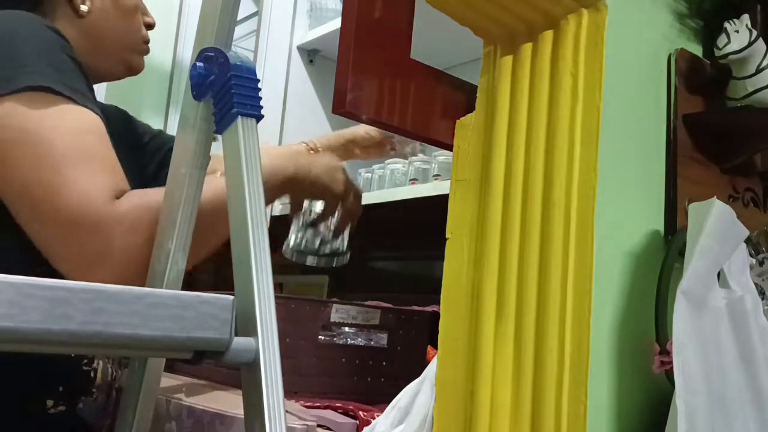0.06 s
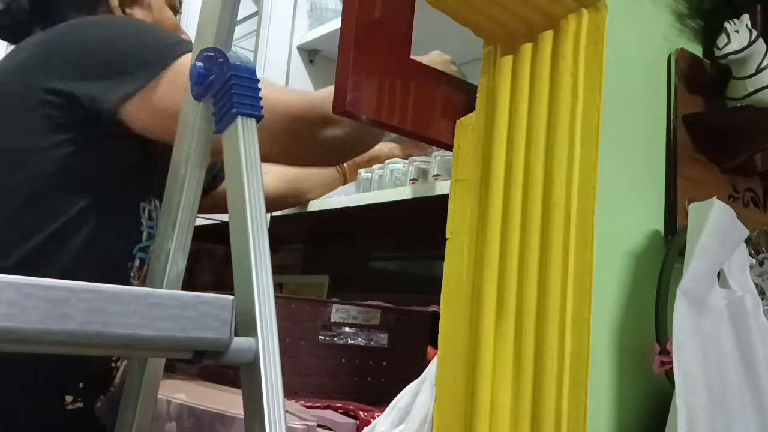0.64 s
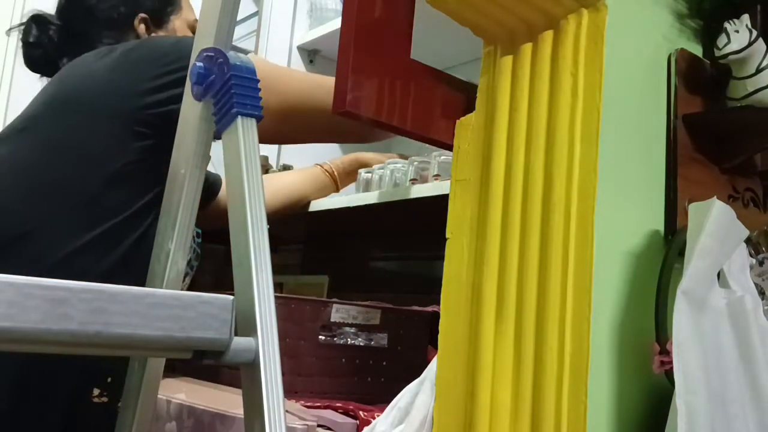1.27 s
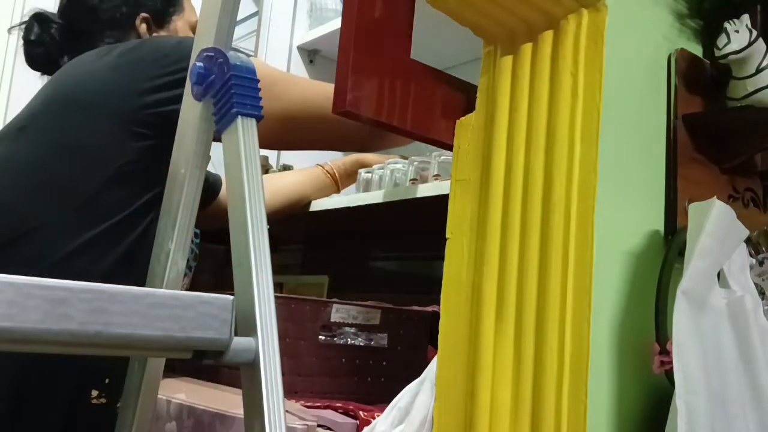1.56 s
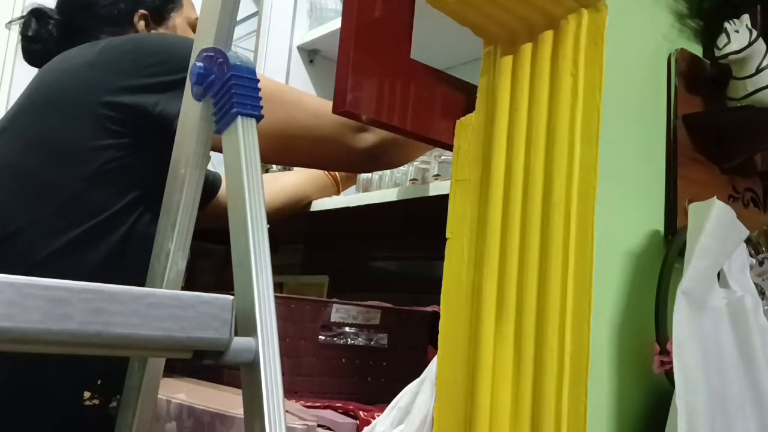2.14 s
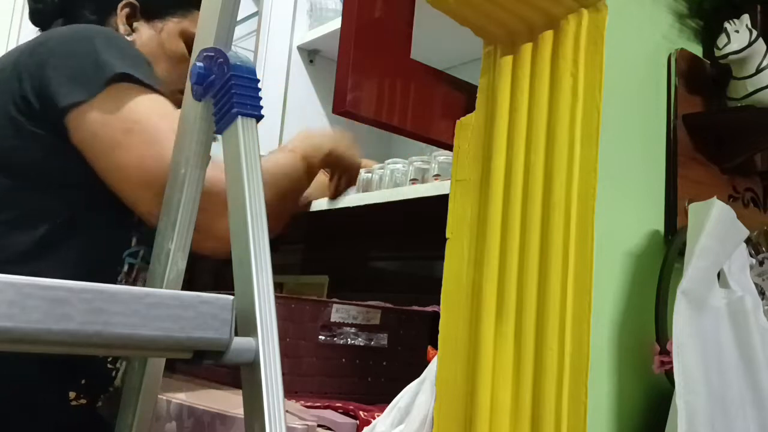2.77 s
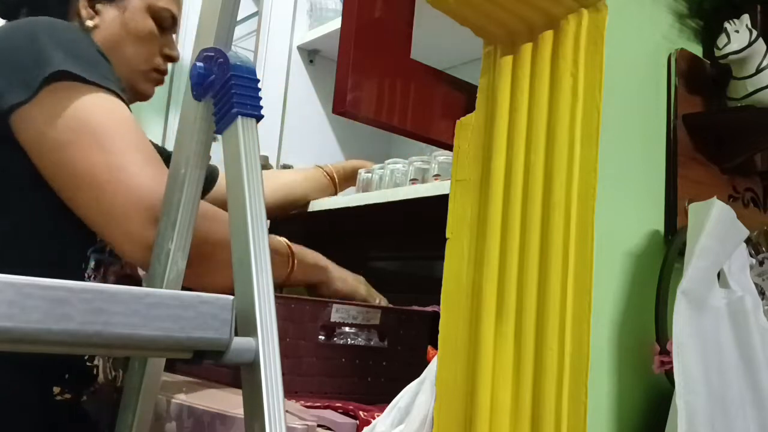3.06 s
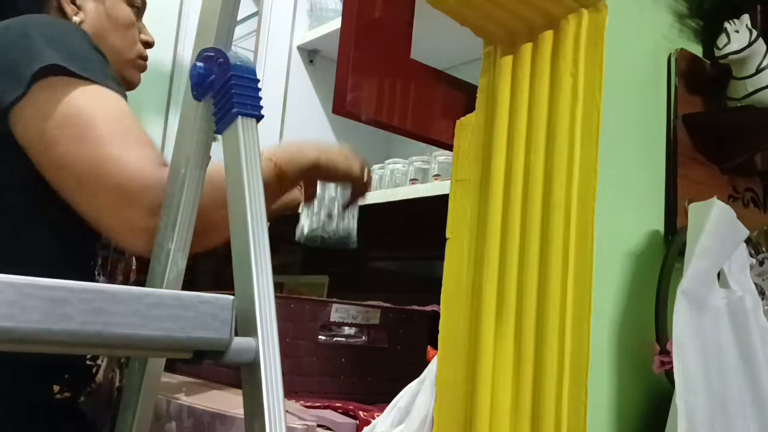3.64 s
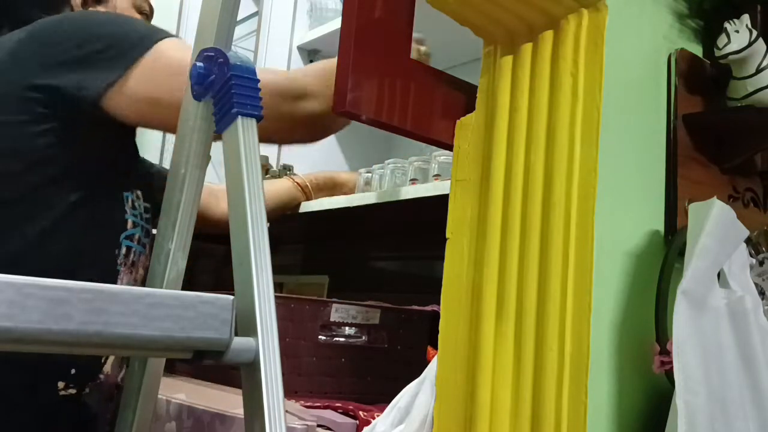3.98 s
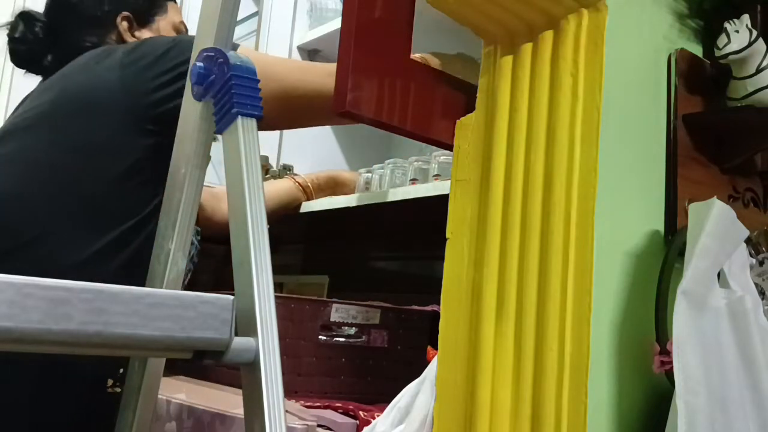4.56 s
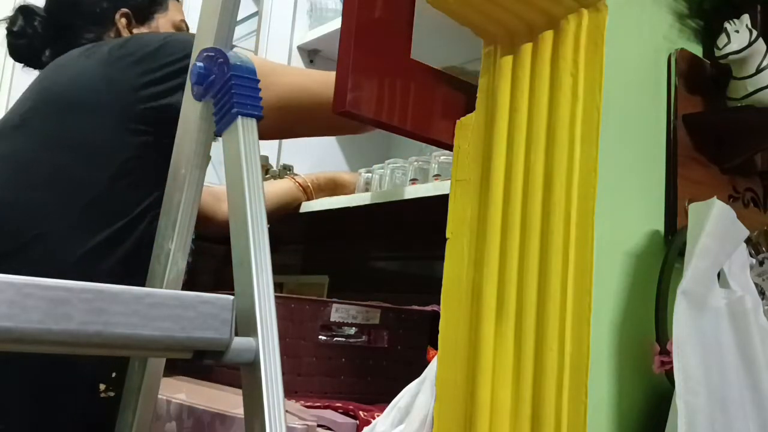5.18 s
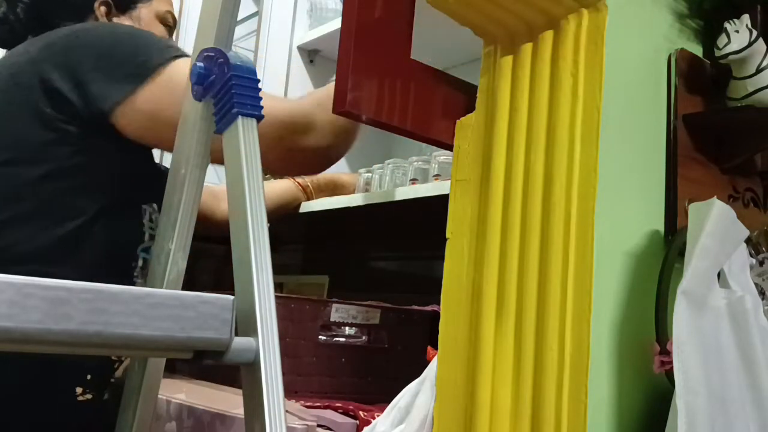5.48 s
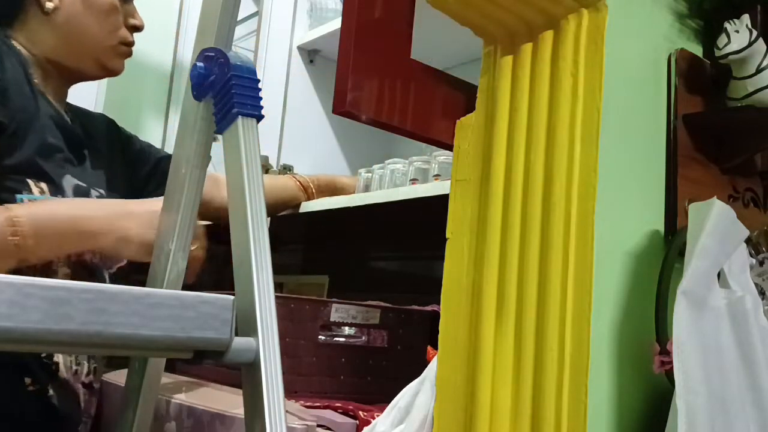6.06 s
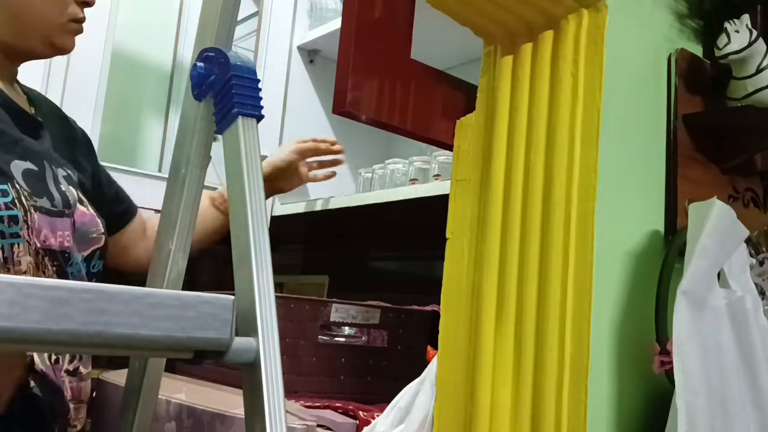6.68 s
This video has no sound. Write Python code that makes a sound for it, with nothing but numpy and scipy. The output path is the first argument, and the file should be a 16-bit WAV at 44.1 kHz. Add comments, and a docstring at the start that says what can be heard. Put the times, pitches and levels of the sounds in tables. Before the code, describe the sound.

Drinking glasses knock onto a cabinet shelf and clink together with brief rings, while bangles clack in an echoing kitchen.

```python
"""Drinking glasses are lifted from a crate and set down on a cabinet shelf in a hard-walled kitchen.
Each base knocks the board and rings briefly, and glasses held together chime.
Bangles clack and slide on the wrist. The room echoes every contact, and a noise suppressor
turns the pauses down, so the room noise swells around each sound."""
import sys
import numpy as np
from scipy import signal
from scipy.fft import rfft, irfft, next_fast_len
from scipy.io import wavfile
from scipy.ndimage import uniform_filter1d, map_coordinates

SR = 44100
rng = np.random.default_rng(int(sys.argv[2]) if len(sys.argv) > 2 else 0)


def store_wav(level_fs):
    """Save 16-bit WAV to argv[1]."""
    pcm = np.round(np.clip(np.atleast_2d(level_fs), -1, 1) * 32767)
    wavfile.write(sys.argv[1], SR, pcm.T.astype(np.int16))


N = 300762
T = np.arange(SR) / SR  # the first second after a contact


def amp(db):
    """Turn decibels into a gain."""
    return np.exp(np.asarray(db) * np.log(10) / 20)


def along(points, hz):
    """Read the value at any pitch from (pitch_hz, value) points."""
    pitches, values = np.transpose(points)
    return np.interp(np.log(hz + 1), np.log(pitches + 1), values)


def peaks(resonances, hz):
    """Decibels that (pitch_hz, width_hz, boost_db) resonances add at each pitch."""
    return sum(db / (1 + (2 * (hz - centre) / width) ** 2) for centre, width, db in resonances)


def treble(hz, edge_hz):
    """Rise smoothly from 0 below the edge to 1 above it."""
    return hz ** 4 / (hz ** 4 + edge_hz ** 4)


def filtered(sound, gain):
    """Give each pitch in a sound its own gain."""
    size = next_fast_len(sound.shape[-1] + SR // 10)
    return irfft(rfft(sound, size) * gain(np.fft.rfftfreq(size, 1 / SR)), size)[..., :sound.shape[-1]]


def unit_hit(hit):
    """Scale a hit to average (rms) level 1 over its first sixteenth of a second."""
    return hit / np.sqrt(np.mean(hit[..., :SR // 16] ** 2, axis=-1, keepdims=True) + 1e-20)


def coloured(hit, gain_db):
    """Shape a hit's tone so that its resonances ring only after the blow."""
    cepstrum = irfft(np.log(amp(gain_db(np.fft.rfftfreq(SR, 1 / SR)))))
    cepstrum[1:SR // 2] *= 2
    cepstrum[SR // 2 + 1:] = 0
    return unit_hit(irfft(rfft(hit, SR) * np.exp(rfft(cepstrum))))


def steady_noise(tone):
    """Noise with the given tone, at average (rms) level 1."""
    noise = filtered(rng.standard_normal(N), lambda f: amp(along(tone, f)))
    return noise / noise.std()


def wobble(per_s):
    """A smooth curve through per_s random values a second."""
    return map_coordinates(rng.standard_normal(int(N * per_s / SR) + 4), [np.arange(N) * per_s / SR])


def add(track, start_s, sound):
    """Mix a sound into a track."""
    start = round(start_s * SR)
    part = sound[max(-start, 0):N - start]
    track[max(start, 0):][:len(part)] += part


# How long the kitchen echoes: pitch_hz, fade_s (a fade is the time to drop 60 dB)
ROOM_FADE = [(120, 0.85), (400, 0.63), (1000, 0.48), (2500, 0.48), (5000, 0.47), (9500, .4), (15000, .32)]
# First echoes off the walls: delay_s, level_db
WALL_ECHOES = [(.0045, 0.5), (0.0105, -10), (.022, 2), (0.038, 2)]
def kitchen(direct_db, walls_db, build_s, contact_s, bend=1.196, smear_s=.035):
    """A contact in the room: a short burst, wall echoes smeared by furniture, then a long tail."""
    hz, t, bands = signal.stft(rng.standard_normal(SR), SR, nperseg=256)
    fade = amp(-60 * (t / along(ROOM_FADE, hz)[:, None]) ** bend)  # slow at first, then faster
    tail = signal.istft(bands * fade, SR, nperseg=256)[1][:SR]
    tail *= 1 - np.exp(-T / build_s)
    direct = rng.standard_normal(SR) * amp(-60 * T / contact_s) * (1 - np.exp(-T / 0.0018))
    bounces = sum(amp(db - 60 * np.abs(T - s) / smear_s) * (T > s) for s, db in WALL_ECHOES)
    walls = rng.standard_normal(SR) * bounces
    parts = [(0, tail), (direct_db, direct), (walls_db, walls)]
    return sum(amp(db) * part / np.linalg.norm(part) for db, part in parts)


# Glass touches glass, waking the rim, wall and high notes: start_s, tick_db, rim_db, wall_db, high_db
TOUCHES = [(-.02, -34.5, -20, -36, -41), (3.36, -58, -62.5, -80, -93.5), (3.427, -41.5, -24, -47, -66),
           (3.451, -39, -36, -49, -68), (3.472, -43.5, -22.5, -44.5, -67.5),
           (3.498, -43.5, -20.5, -36.5, -40), (3.51, -40, -24, -31, -43), (3.523, -43, -27.5, -32.5, -44),
           (3.538, -49.5, -23.5, -29, -36.5), (3.559, -48, -20.5, -25.5, -40)]
# Tone of the tick as they touch: pitch_hz, level_db
TICK_TONE = [(200, -25), (550, -15), (850, -6.5), (1700, -3.5), (3000, -3), (4500, -28), (7000, -38.5),
             (9500, -29), (16000, -56)]
def glass_ticks():
    """Glasses in one hand tick as they meet, more brightly when the high notes are strong."""
    out = np.zeros(N)
    for start_s, tick_db, rim_db, _, high_db in TOUCHES:
        bright_db = 0.44 * (high_db - rim_db) + 13.5
        hit = kitchen(direct_db=-1, walls_db=-7, build_s=0.0069, contact_s=0.0091)
        tick = coloured(hit, lambda f: along(TICK_TONE, f) + bright_db * treble(f, edge_hz=5000))
        add(out, start_s, amp(tick_db) * tick)
    return out


# The high notes of a drinking glass: pitch_hz, level_db
HIGH_NOTES = [(5830, -7), (5900, -17), (8640, -9.5), (8770, -2), (8900, -6.5), (10990, -17.5), (12080, -14),
              (12560, -30.5), (13680, -30.5), (14680, -33), (15080, -27)]
def glass_chimes(rim_hz=2436, wall_hz=3088, rim_fade_s=0.67, jolt_rad=0.65, rub_rad=0.23, flutter_db=2.5):
    """Held glasses ring freely: each touch feeds their notes and jolts the vibration."""
    ring, t = np.zeros(N), np.arange(N) / SR
    starts, _, rim_db, wall_db, high_db = np.transpose(TOUCHES)
    high = [(hz, high_db + db - 2 * np.log2(hz / 8800)) for hz, db in HIGH_NOTES]
    for hz, levels in [(rim_hz, rim_db), (wall_hz, wall_db)] + high:
        energy, jolts = np.zeros(N), np.zeros(N)
        fade_s = rim_fade_s * (rim_hz / hz) ** 0.43
        fade = amp(-60 * T / fade_s)
        for start_s, db in zip(starts, levels):
            add(energy, start_s, (amp(db) * fade) ** 2)
            add(jolts, start_s, rng.normal(0, jolt_rad, 1))
        swing = np.abs(uniform_filter1d(np.sqrt(2 * energy), size=48))
        flutter = (hz / rim_hz) ** .5 * wobble(per_s=110)  # rubbing shakes the high notes most
        phase = uniform_filter1d(np.cumsum(jolts), size=48) + rub_rad * flutter
        ring += swing * amp(flutter_db * flutter) * np.sin(2 * np.pi * hz * t + phase)
    room = kitchen(direct_db=-16, walls_db=-8, build_s=0.0037, contact_s=0.012)
    echo = signal.fftconvolve(ring, room)[:N]
    return (ring + amp(-11) * echo) * waver_and_drop(t)


def waver_and_drop(t, lift_s=3.588, waver_hz=6.1, waver_db=10.5, drop_s=3.83, drop_db_per_s=166):
    """The level wavers once the glasses are lifted; then the ring and its echo fall away quickly,
    as the noise suppressor turns them down."""
    waver = np.sin(np.pi * waver_hz * np.maximum(t - lift_s, 0)) ** 4
    drop_db = np.clip(drop_db_per_s * (t - drop_s), 0, 14.5)
    return amp(-waver_db * waver - drop_db)


# Tone of the quiet kitchen: pitch_hz, level_db
ROOM_TONE = [(25, -42), (58, -9), (100, -5), (190, -7.5), (310, -11), (550, -14), (1000, -16.5),
             (1650, -22.5), (2600, -29), (4200, -40), (7000, -50), (9400, -42), (12000, -51), (16000, -62)]
def room_noise():
    """A faint, low, steady rush fills the room."""
    return amp(-52) * steady_noise(ROOM_TONE)


# Bangles hit each other: start_s, level_db, treble_db
BANGLE_HITS = [(.044, -29, 6.5), (.067, -33, -2.5), (.493, -22, 3), (2.231, -46, -6), (3.047, -46.5, -2),
               (4.083, -39.5, 0), (4.607, -50.5, -12.5), (4.925, -35, 0.5), (5.977, -42.5, 0),
               (6.186, -30.5, 3), (6.316, -32, 3), (6.455, -38, -2.5)]
# Overall tone of a clack: pitch_hz, level_db
CLACK_TONE = [(100, -19), (330, -14.5), (700, -19), (1100, -16.5), (1300, -5.5), (2300, -0.5),
              (3000, -14.5), (4200, -16), (4700, -23), (8300, -16), (9700, -10), (12500, -20.5),
              (15500, -21)]
# Pitches that stand out in a clack: pitch_hz, width_hz, boost_db
CLACK_PEAKS = [(1250, 50, 10.5), (1350, 100, 4), (1504.5, 140, 7.5), (1812, 26, 4), (1890, 35, 3),
               (2205, 22, 9), (2810, 80, 6), (3370, 43, 8), (3950, 170, 6.5), (6450, 880, 3.5),
               (9270, 1100, 7.5)]
def bangle_clacks():
    """Bangles meet in hard, short clacks that set the whole room echoing."""
    out = np.zeros(N)
    for start_s, level_db, treble_db in BANGLE_HITS:
        hit = kitchen(direct_db=-8, walls_db=-15, build_s=0.0019, contact_s=0.017, bend=1.1)
        tone_db = lambda f: along(CLACK_TONE, f) + peaks(CLACK_PEAKS, f) + treble_db * treble(f, 4600)
        add(out, start_s, amp(level_db) * coloured(hit, tone_db))
    return out


# A glass lands on the shelf: start_s, knock_db, knock_hz, bass_db, rim_db, high_db, rim_hz
LANDINGS = [(.338, -19, 626, -7, -18.5, -38, 2424), (.347, -14.5, 700, -3.5, -31, -44.5, 2445),
            (.368, -31, 627, -6, -22.5, -44.5, 2460), (.453, -36.5, 520, -9.5, -38.5, -56, 2655),
            (.614, -26, 720, 0, -37, -56.5, 2478), (.655, -31, 756, 5, -43.5, -64, 2440),
            (.772, -28, 799, 2.5, -43.5, -57, 2520), (1.072, -18.5, 662, -11, -33.5, -40.5, 2470),
            (1.21, -24.5, 590, -3.5, -34.5, -61, 2470), (1.282, -27, 561, 3, -26, -48.5, 2463),
            (1.449, -22, 852, 2, -30, -48, 2483), (2.018, -58.5, 815, 3.5, -85, -78, 2425),
            (2.232, -29.5, 586, 7.5, -50, -64, 2370), (2.253, -29, 482, 9, -46, -62.5, 2396),
            (2.272, -33, 479, 5, -49, -64, 2420), (2.386, -45.5, 474, 9, -68, -78.5, 2440),
            (4.628, -41, 736, 20, -67, -71, 2470), (4.661, -27, 500, 8, -28.5, -52, 2379),
            (4.711, -23.5, 727.4, -2.5, -31.5, -43.5, 2453), (4.947, -28.5, 856, 5, -42.5, -73, 2503)]
# Tone of the thud: pitch_hz, level_db
THUD_TONE = [(40, -44), (100, -16.5), (200, -6), (380, -2), (650, 2), (1100, 1.5), (1800, -9),
             (2900, -10.5), (3700, -35), (5000, -42), (7500, -42.5), (9500, -32), (12000, -49.5),
             (16000, -51.5)]
def glasses_set_down():
    """A thick base knocks the board, and both the shelf and the glass ring."""
    out = np.zeros(N)
    for start_s, knock_db, knock_hz, bass_db, rim_db, high_db, rim_hz in LANDINGS:
        # each spot on the board favours its own pitches
        spot_db = lambda f: peaks([(knock_hz, 220, 6)], f) + bass_db / (1 + (f / 260) ** 4)
        hit = kitchen(direct_db=-5.5, walls_db=-9, build_s=0.0044, contact_s=0.027)
        thud = coloured(hit, lambda f: along(THUD_TONE, f) + spot_db(f))
        knock = amp(-2.5) * thud + amp(-5.5) * shelf_ring(spot_db)
        add(out, start_s, amp(knock_db) * knock + damped_glass(knock_db, rim_db, high_db, rim_hz))
    return out


# Notes of the loaded shelf and cabinet: pitch_hz, level_db, fade_s
SHELF_NOTES = [(152.8, -9.5, 0.38), (244.3, -8.5, 0.92), (312.7, -6.5, 0.42), (337, -10, .4),
               (469.4, 0, .5), (555, -1, 0.38), (649.7, -2.5, 0.45), (735, -2.5, 0.13), (756, 1.5, 0.38),
               (727, -7, 0.12), (869, -2.5, 0.61), (814, -3.5, 0.11), (1044, -11, 0.93), (1130, -5.5, 0.6),
               (1306, -6.5, 0.15), (1340, -10.5, 0.57), (1417, -7, 0.71)]
def shelf_ring(spot_db, spread_db=5, rise_s=0.0021):
    """The shelf's notes ring at new strengths for each landing."""
    hz, db, fade_s = np.transpose(SHELF_NOTES)
    db = db + rng.normal(0, spread_db, len(hz)) + spot_db(hz)
    phase = 2 * np.pi * (np.outer(hz, T) + rng.random((len(hz), 1)))
    notes = np.sin(phase) * amp(-60 * T / fade_s[:, None])
    return unit_hit(amp(db) @ notes * (1 - np.exp(-T / rise_s)))


def damped_glass(knock_db, rim_db, high_db, rim_hz, wall_hz=3102, light_fade_s=0.09, halving_db=12.5):
    """The glass bends and rings until the board stops it: sooner for firm knocks and high notes."""
    room = kitchen(direct_db=-1, walls_db=-1.5, build_s=0.011, contact_s=0.056)
    high_hz, note_db = np.transpose(HIGH_NOTES)
    grip_shift = 1 + 0.0068 * rng.standard_normal(len(high_hz))  # each grip retunes the high notes
    hz = np.r_[rim_hz, wall_hz, high_hz * grip_shift]
    wall_db = rim_db + 0.43 * (knock_db - rim_db) - 8.5
    db = np.r_[rim_db, wall_db, high_db + note_db + rng.normal(0, 1.5, len(high_hz))]
    fade_s = light_fade_s * .5 ** ((knock_db - rim_db) / halving_db) * (rim_hz / hz) ** 0.5
    t = T[:SR // 3]
    notes = np.sin(2 * np.pi * np.outer(hz, t)) * amp(-60 * t / fade_s[:, None])
    notes *= 1 - np.exp(-t / 0.00097)
    heard = signal.fftconvolve(notes, room[None, :SR * 2 // 3], axes=1)
    return np.pad(amp(db) @ unit_hit(heard), (0, SR - heard.shape[1]))


# Bangles slide along the moving forearm: start_s, length_s, level_db
BANGLE_SLIDES = [(2.08, .2, -78), (3.12, .4, -72.5), (5.76, .12, -79.5), (6.6, .3, -76)]
# Tone of their jingle: pitch_hz, level_db
JINGLE_TONE = [(3000, -21.5), (7000, -19.5), (9400, 1.5), (12000, -13), (16000, -18)]
def bangle_slides(flutter_db=2.5):
    """Sliding bangles give a faint, bright jingle that swells and fades."""
    swell = np.zeros(N)
    for start_s, length_s, level_db in BANGLE_SLIDES:
        add(swell, start_s, amp(level_db) * np.hanning(int(length_s * SR)))
    return swell * amp(flutter_db * wobble(per_s=75)) * steady_noise(JINGLE_TONE)


def scene():
    """Glasses and bangles over the steady room noise, in one channel."""
    glasses = glasses_set_down() + glass_ticks() + glass_chimes()
    return (glasses + bangle_clacks() + bangle_slides() + room_noise())[None]


def near_quiet(power, margin_db, softness_db):
    """Close to 1 while a sound stays near its own quiet level, 0 well above it."""
    level_db = 10 * np.log10(power + 1e-20)
    quiet_db = np.percentile(level_db, 15, axis=-1, keepdims=True)
    return .5 - .5 * np.tanh((level_db - quiet_db - margin_db) / (2 * softness_db))


def record(dry, cut_db=2, pause_cut_db=15, lag_s=0.084, top_hz=15700):
    """A noise suppressor turns quiet pitch bands down, most in pauses; the top treble is cut off."""
    hz, t, bands = signal.stft(dry[0], SR, nperseg=512)
    power = uniform_filter1d(np.abs(bands) ** 2, size=3, axis=0)  # smooth over pitch
    power = np.abs(uniform_filter1d(power, size=5, axis=1))  # then over time
    quiet = near_quiet(power, margin_db=8, softness_db=4)
    active = 1 - near_quiet(power[hz > 1000].sum(axis=0), margin_db=10, softness_db=3)
    memory = np.exp(-t[1] / lag_s)
    pause = 1 - signal.lfilter([1 - memory], [1, -memory], active)
    gain = amp(-quiet * (cut_db + pause_cut_db * pause))
    cleaned = signal.istft(bands * gain, nperseg=512)[1][None, :N]
    return filtered(cleaned, lambda f: 1 / (1 + (f / top_hz) ** 200))


dry = scene()
out = record(dry)
store_wav(out)
```